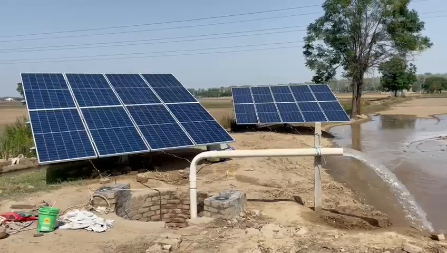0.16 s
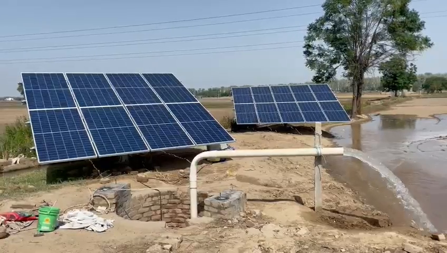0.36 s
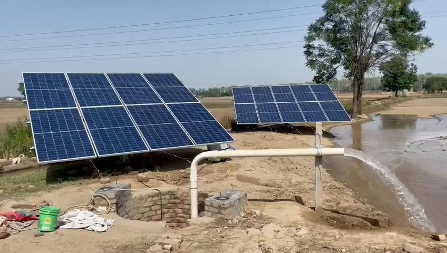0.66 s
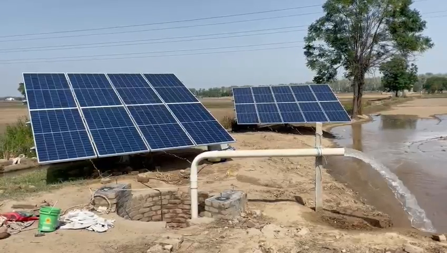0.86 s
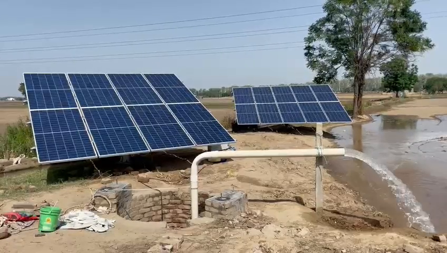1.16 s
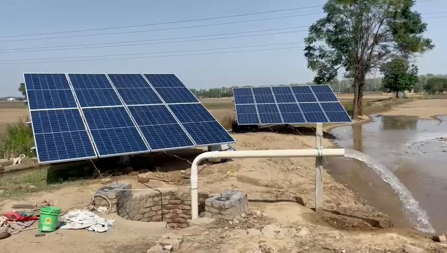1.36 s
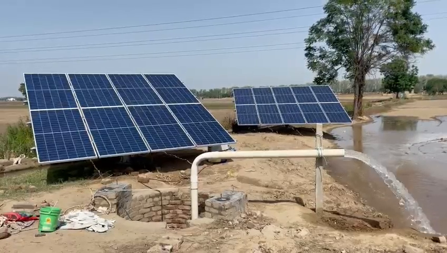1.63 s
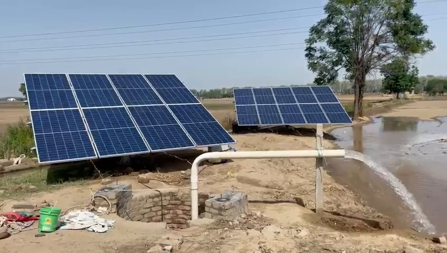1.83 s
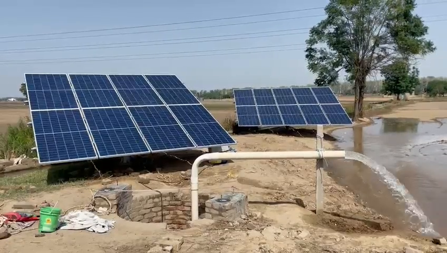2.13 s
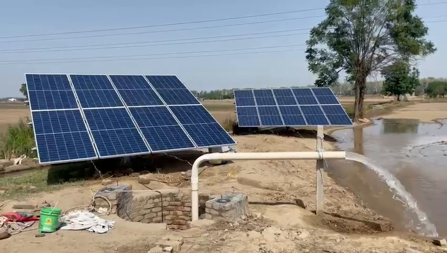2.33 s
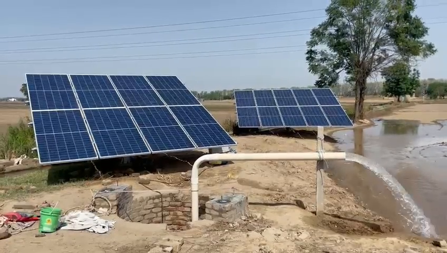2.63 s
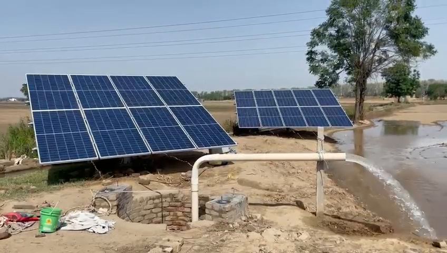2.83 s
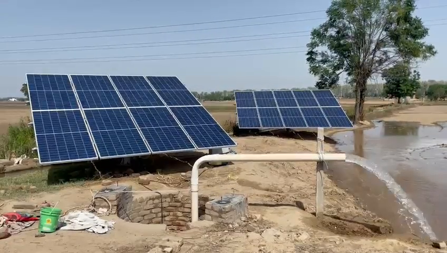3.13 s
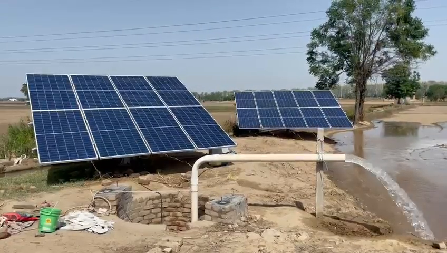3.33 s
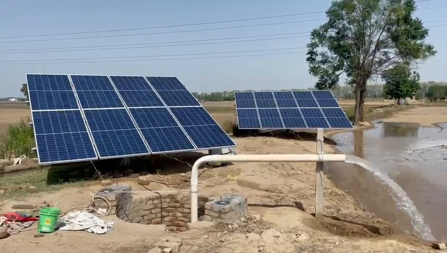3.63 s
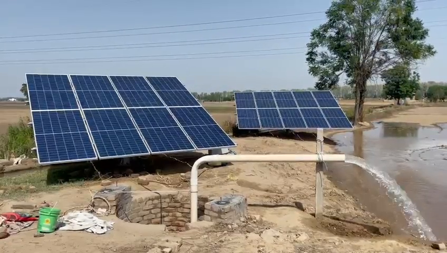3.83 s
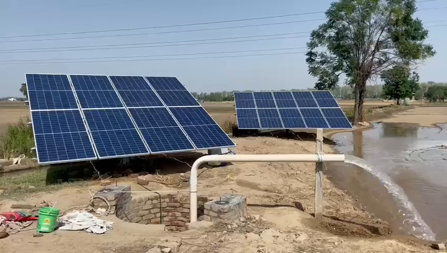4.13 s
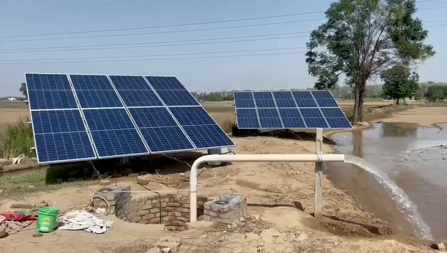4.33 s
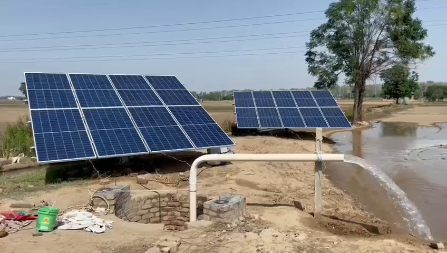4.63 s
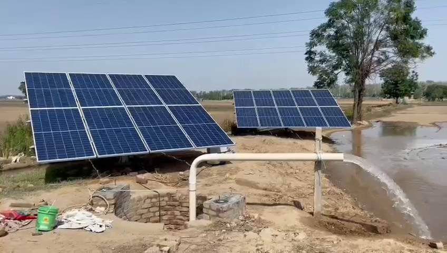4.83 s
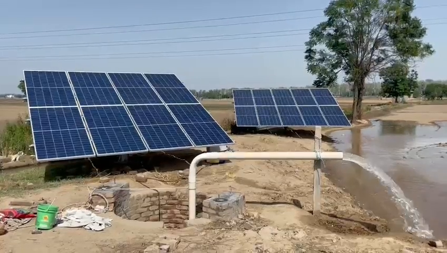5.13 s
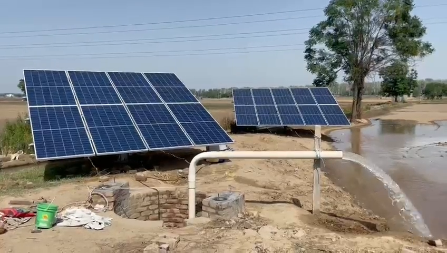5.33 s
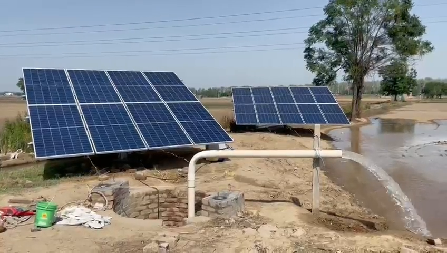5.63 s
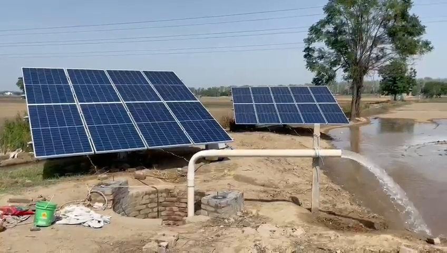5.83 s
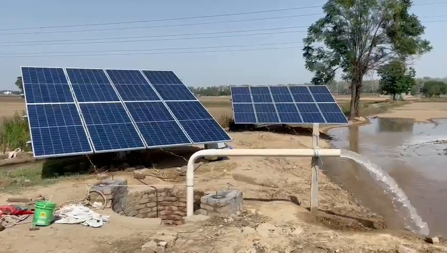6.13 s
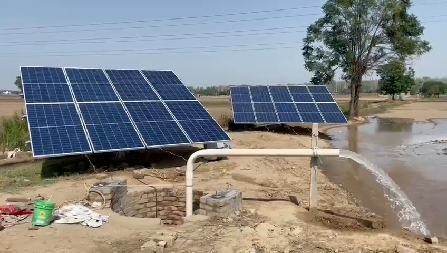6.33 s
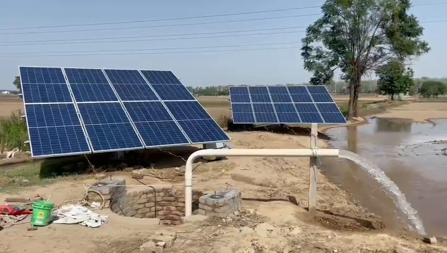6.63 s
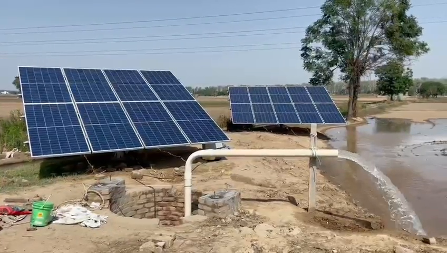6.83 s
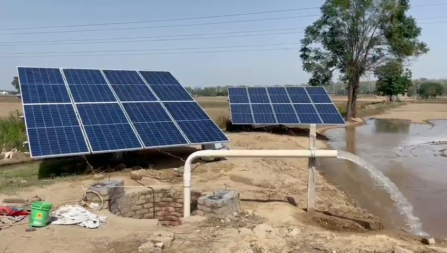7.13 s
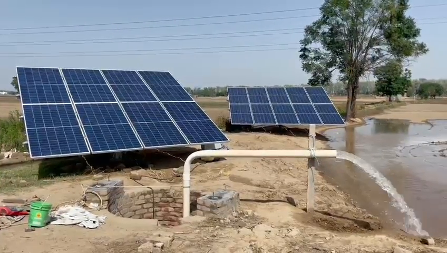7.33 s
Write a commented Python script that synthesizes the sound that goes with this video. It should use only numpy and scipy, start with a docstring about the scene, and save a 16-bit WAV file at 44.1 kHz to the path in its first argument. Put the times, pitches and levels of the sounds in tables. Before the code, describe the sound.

Outdoors a few metres from a pipe, a thick stream of water rushes without pause into a flooded field, gurgling low, churning in the middle and hissing with spray. Occasional bubbles plop and water lumps slap. Irregular wind buffets the unprotected stereo microphone in deep, short falling thumps, most crowded from about five to six seconds. A thin pump inverter whine stays faint underneath.

```python
"""Flooded field, a few metres from a pipe through which a solar pump throws a thick jet of water.
The jet is summed from ringing bubbles, drop ticks and foam noise in three bands; single bubbles
plop out of it and lumps of water slap down as short noise bursts.
The pump's inverter whines thinly in wavering sines and narrow noise.
Wind buffets the two ports of the microphone: filtered random kicks plus single falling thumps."""
import sys
import numpy as np
from scipy import signal
from scipy.fft import rfft, irfft
from scipy.io import wavfile

SR = 44100
rng = np.random.default_rng(int(sys.argv[2]) if len(sys.argv) > 2 else 0)


def wav_out(sig):
    """Save sig, one row per channel (or a flat mono array), as 16-bit PCM at SR to the path in sys.argv[1]."""
    wavfile.write(sys.argv[1], SR, np.round(np.clip(np.atleast_2d(sig).T, -1, 1) * 32767).astype(np.int16))


N = 329427
TIME, HZ = np.arange(N) / SR, np.fft.rfftfreq(N, 1 / SR)

# All levels in the time and event tables are before the trims in the functions; spectra are relative.

# wind strength: (time [s], level [dB])
WIND_LEVEL = [(0, -47.5), (0.4, -56.5), (.62, -44.5), (.68, -48), (0.73, -59), (.79, -47), (.88, -50),
              (1.15, -45), (1.3, -37.5), (1.37, -46), (1.46, -38), (1.59, -40), (1.9, -46), (2.15, -44),
              (2.4, -44), (2.44, -46), (2.52, -55), (2.68, -43), (2.85, -49.5), (3.15, -41), (3.45, -44),
              (3.58, -47), (3.72, -42.5), (3.98, -51), (4.15, -45), (4.47, -38.5), (4.68, -41.5),
              (4.77, -39.5), (4.86, -46), (4.95, -37), (5.22, -36.5), (5.4, -37), (5.85, -41), (6.1, -41),
              (6.33, -46), (6.63, -48), (6.85, -41), (7.15, -38), (7.27, -57), (7.36, -32), (7.47, -39)]
# wind rumble spectrum: (frequency [Hz], density [dB per Hz])
RUMBLE_SPECTRUM = [(15, -40), (28, -22), (42, -13.5), (60, -0.5), (100, -8.5), (200, -10.5), (255, -12),
                   (340, -35.5), (600, -22), (1500, -79), (4000, -103)]
# single strong eddies, wide ones sharper: (time [s], peak [dB], centre [Hz], width [octaves])
EDDIES = [(.034, -26, 123, 0.97), (.11, -25.5, 332, 0.6), (0.179, -29, 68, .6), (0.269, -34, 258, .7),
          (.614, -45, 200, .7), (1.435, -23.5, 201, 0.42), (1.487, -21, 105.5, 0.97), (1.564, -25, 252, .5),
          (1.674, -33, 90, 0.72), (1.744, -25, 109, .8), (1.763, -25.5, 247, 0.15),
          (1.778, -25.5, 89, 0.87), (1.795, -27.5, 120, 0.95), (1.958, -23.5, 282, 0.78),
          (2.024, -32, 127, 0.63), (2.119, -26, 70, 0.92), (2.182, -25, 110, .65),
          (2.389, -27.5, 282, 0.31), (3.257, -30, 226, 0.86), (3.408, -26.5, 105, 0.76),
          (3.667, -27, 137, 0.51), (3.821, -26, 99, 0.83), (4.071, -28, 123, 0.97), (4.308, -26, 252, 0.63),
          (4.454, -29.5, 188, 1), (4.741, -31, 191, 0.8), (4.801, -29, 170, 0.79), (4.936, -19, 127, 1),
          (4.962, -25, 65, 0.37), (4.99, -32, 76, 0.64), (5.012, -24, 64, 0.39), (5.036, -28, 234, 0.21),
          (5.093, -23, 105, 0.53), (5.14, -28, 134, .95), (5.172, -29, 142, .4), (5.329, -23.5, 65, 0.98),
          (5.349, -23, 119.5, 0.93), (5.39, -21, 136, 0.76), (5.42, -26, 76.5, 0.96),
          (5.445, -23, 108, 0.47), (5.514, -28.5, 160, 0.19), (5.533, -26, 65, 0.57),
          (5.602, -27, 66, 0.53), (5.699, -26, 65, .45), (5.74, -24.5, 103, 0.86), (5.764, -26.5, 74, 0.61),
          (5.813, -27, 89, 0.55), (5.875, -27, 170, .8), (5.93, -25, 143, 0.72), (5.951, -26.5, 170, 0.42),
          (6.169, -24, 225, 0.44), (6.247, -26, 290, 0.35), (6.551, -30.5, 132, 0.74),
          (6.676, -29, 88.5, 0.88), (6.808, -16.5, 184, 0.41), (6.825, -21.5, 104, 0.96),
          (6.896, -27, 166, 0.67), (6.982, -25.5, 141, 0.84), (7.048, -41, 99, 0.84),
          (7.17, -27.5, 107, 0.36), (7.342, -28, 121, 0.58), (7.395, -24, 80.5, 0.42),
          (7.466, -24, 306, 0.33)]
# inverter switching tone and sidebands: (frequency [Hz], level [dB rms], right/left factor [-])
INVERTER_TONES = [(4040, -73, -.2), (4118, -70.5, -.2), (7389, -73.5, -.1), (7922, -70, -1),
                  (8000, -59.5, -.97), (8234, -77, -1), (8533, -76, -.9)]
# splashing spectrum at the left port: (frequency [Hz], density [dB per Hz])
WATER_SPECTRUM = [(100, -6.5), (280, 0), (440, 1), (510, -4), (570, -11), (650, -8.5), (980, -10.5),
                  (1100, -11), (1520, -12.5), (1680, -14), (1790, -18), (1950, -12.5), (2130, -11),
                  (3050, -16), (3900, -18), (5300, -22.5), (6400, -21.5), (7600, -29), (8400, -55),
                  (9100, -27.5), (10250, -28), (11400, -27.5)]
# right port relative to left: (frequency [Hz], gain [dB])
RIGHT_GAIN = [(450, -.8), (600, -.8), (780, 5.5), (1080, -.6), (1970, .1), (2210, -13), (2430, -3.2),
              (2730, -12), (2900, -7.8), (3120, -13), (3400, -8.1), (3900, -6.4), (4400, -2.8), (5400, 0)]
# likeness of the ports: (frequency [Hz], likeness [0-1])
PORT_LIKENESS = [(450, .76), (950, .82), (1100, .98), (1300, .75), (2000, .87), (2200, .45), (2400, .77),
                 (4000, .35), (4400, .76), (5600, .98), (6700, .98), (7300, .6), (7650, 1), (9100, .99),
                 (9750, .6), (10400, 1)]
# lead of the left port: (frequency [Hz], phase [rad])
LEFT_LEAD = [(300, -.05), (650, -.9), (1100, .04), (1750, -1.2), (2100, .1), (2280, -3), (2600, -1),
             (2850, 1.4), (3600, 6.8), (4400, 12.7), (6950, 12.4), (7600, 9.45), (9400, 9.35),
             (10100, 2 * np.pi)]
# large bubbles plopping out of the rush: (time of peak [s], peak [dB], pitch [Hz], cycles to peak [-])
PLOP_EVENTS = [(.338, -25.5, 437, .5), (.802, -31, 466, 2.7), (1.067, -35, 1020, 2.5),
               (1.832, -32.5, 840, 2), (2.631, -37, 830, 1.8), (2.825, -30, 423, 1.2),
               (3.716, -31, 1630, 3.5), (4.487, -30, 378, 0.92), (6.726, -30.5, 367, 2.2),
               (6.893, -27, 430, 1.53), (7.44, -25.5, 2030, 3.8)]
# lumps of water slapping down: (time [s], level [dB], centre [Hz], width [octaves], decay [s])
SLAP_EVENTS = [(.383, -39.5, 1420, .3, .016), (.524, -42, 3400, .5, 0.0054), (.543, -40, 2700, 0.6, 0.011),
               (.562, -40.5, 2100, .4, .005), (.782, -36.5, 2900, 0.46, .008),
               (.793, -40, 2100, 0.47, 0.0098), (1.787, -36, 1000, 0.37, 0.0084),
               (1.998, -35.5, 3060, .37, .005), (2.132, -35, 1650, .55, 0.0087),
               (2.336, -44.5, 4480, .47, .029), (2.615, -40, 4800, .5, 0.0065),
               (2.666, -41, 3800, 0.72, .008), (3.038, -40, 1600, 0.39, 0.016),
               (3.148, -38.5, 1200, .8, 0.0067), (3.6, -44, 4500, 0.84, 0.021),
               (3.662, -42, 850, 0.5, .025), (3.853, -35.5, 1690, 0.45, 0.0096),
               (4.222, -37, 1600, 0.54, .007), (4.529, -42.5, 4360, 0.44, 0.012),
               (4.718, -44, 1040, .6, 0.032), (4.757, -40.5, 3000, 0.91, 0.006),
               (4.964, -44, 4200, 0.49, 0.0053), (5.815, -44.5, 4500, .59, .011),
               (5.986, -36, 2700, 0.49, 0.0088), (6.552, -37, 2100, .4, 0.0083),
               (6.872, -44, 920, .35, 0.012), (6.962, -44, 950, .35, 0.016), (6.977, -49, 5200, 0.5, .006),
               (7.436, -36, 2500, 0.66, 0.016)]
# low gurgling in the pool: (time [s], level [dB])
GURGLE_LEVEL = [(0, -42), (0.1, -45.5), (0.5, -45), (.6, -48), (.69, -50), (0.71, -57), (.75, -48),
                (0.785, -45.5), (1.0, -44), (1.16, -50.5), (1.3, -45.5), (1.6, -46.5), (1.85, -48.5),
                (2.23, -47), (2.39, -48.5), (2.425, -64), (2.48, -62), (2.52, -43.5), (2.68, -50.5),
                (2.75, -44), (3.4, -45), (3.55, -46.5), (3.8, -45), (3.9, -46), (4.1, -45.5), (4.57, -46.5),
                (4.64, -49), (4.69, -51), (4.74, -45), (4.86, -49.5), (4.97, -45.5), (5.58, -46),
                (5.64, -59), (5.69, -49), (6.0, -47), (6.5, -48.5), (6.68, -46), (6.88, -40.5), (6.95, -57),
                (7.02, -46), (7.28, -51.5), (7.47, -43)]
# gulps, the jet dragging a large air pocket under: (time [s], level [dB])
GULP_EVENTS = [(1.77, -35), (1.96, -39), (4.22, -43), (4.31, -40), (4.45, -36), (5.68, -33.5), (6.15, -37),
               (6.54, -35), (7.0, -36.5), (7.37, -37)]
# churning where the jet lands, between gurgle and spray: (time [s], level [dB])
CHURN_LEVEL = [(0.0, -48), (0.16, -44), (.4, -45.5), (1.02, -44.5), (1.08, -45), (1.14, -46.5),
               (1.25, -44.5), (1.65, -45), (1.98, -44), (2.04, -49.5), (2.11, -46), (2.32, -43),
               (2.44, -44.5), (2.65, -45), (2.95, -45.5), (3.15, -44.5), (3.58, -46), (3.7, -42.5),
               (3.88, -46.5), (4.45, -44), (4.65, -44.5), (4.75, -41.5), (4.83, -49.5), (4.96, -43),
               (5.08, -48), (5.3, -45), (5.8, -45), (6.15, -45), (6.25, -46), (6.6, -45), (6.8, -46),
               (6.86, -45.5), (7.03, -44.5), (7.1, -46), (7.2, -45.5), (7.47, -45.5)]
# spray thrown up by the jet: (time [s], level [dB])
SPRAY_LEVEL = [(0, -54), (.14, -49), (.22, -52), (0.4, -50), (0.55, -49), (.86, -49.5), (.94, -48),
               (1.15, -50), (1.7, -50), (2.3, -49), (2.43, -49.5), (2.65, -47.5), (2.83, -46.5),
               (2.92, -51.5), (3.0, -48), (3.62, -47.5), (4.2, -48), (4.48, -51), (4.58, -49), (4.65, -51),
               (4.75, -47), (4.86, -50), (4.97, -48), (5.5, -50.5), (5.8, -48.5), (5.88, -49), (5.96, -47),
               (6.3, -49), (6.57, -48), (6.76, -50), (7.02, -46.5), (7.16, -50), (7.47, -46.5)]

WAKE_FOLLOW_DB_PER_DB, WAKE_REF_DB = 0.92, -18  # wake level against eddy peak
WAKE_LAG_S = 0.0092  # wake trails its eddy
APART_HZ = 135  # above this the ports feel different eddies
PLOP_RISE_PER_S = 2.9  # pitch climb per second, as a share of the starting pitch
EDGE_HZ = 11800


def amp(db):
    """Decibels to gain."""
    return 10 ** (np.asarray(db) / 20)


def unit(x):
    """Scales to rms 1."""
    return x / np.sqrt(np.mean(x ** 2) + 1e-20)


def along_hz(points):
    """Reads a table on a logarithmic frequency axis."""
    hz, value = np.transpose(points)
    return np.interp(np.log(HZ + 1), np.log(hz + 1), value)


def along_time(points):
    """Reads a time curve at each sample."""
    s, value = np.transpose(points)
    return np.interp(TIME, s, value)


def drift(rate_hz):
    """Random piecewise-linear curve of rms 1 that changes at up to about this rate."""
    knots = rng.standard_normal(8192)
    return unit(np.interp(TIME * 2 * rate_hz + rng.random(), np.arange(len(knots)), knots))


def hump(hz, centre_hz, octaves):
    """Bell-shaped band on the octave scale."""
    return np.exp(-.5 * (np.log2((hz + 1) / centre_hz) / octaves) ** 2)


def above(x, hz):
    """The part of a sound above this frequency."""
    return irfft(rfft(x) / (1 + (hz / (HZ + 1)) ** 6), N)


def add(mix, s, sound):
    """Mixes a sound in from time s on, cropped to the scene."""
    start = round(s * SR)
    sound = sound[..., max(-start, 0):]
    part = mix[..., max(start, 0):][..., :sound.shape[-1]]
    part += sound[..., :part.shape[-1]]


def kicks(per_s, spread_db):
    """Random train of pushes of either sign, most of them small."""
    sizes = amp(spread_db * np.minimum(rng.exponential(1, N), 4)) * rng.choice([-1, 1], N)
    return unit(sizes * (rng.random(N) < per_s / SR))


def swells(times_s, levels_db, width_s):
    """Joint level curve of brief bell-shaped swells, summed in power."""
    power = np.zeros(N)
    t = np.arange(-SR // 4, SR // 4) / SR
    for s, db in zip(times_s, levels_db):
        add(power, s + t[0], amp(db) ** 2 * np.exp(-(t / width_s) ** 2))
    return np.sqrt(power)


def ports(near, scattered):
    """Spectra of direct and scattered sound, as the left and right ports hear them."""
    same = np.clip(along_hz(PORT_LIKENESS), 0, 1)
    blend = same * near + np.sqrt(1 - same ** 2) * scattered
    right = blend * amp(along_hz(RIGHT_GAIN)) * np.exp(-1j * along_hz(LEFT_LEAD))
    return irfft(np.array([near, right]), N)


def bass_lag_s(hz, turns=1.677):
    """The microphone passes low notes late, so each push of air falls in pitch."""
    return turns / np.sqrt(hz ** 2 + 45 ** 2)


def lagged(hz):
    """Phase turn of the bass lag: the delay summed over frequency."""
    return np.exp(-2j * np.pi * np.cumsum(bass_lag_s(hz)) * hz[1])


def stirred(band_hz, octaves, width_s):
    """Turbulence level around the strong eddies: each stirs the band near its own size."""
    s, db, centre_hz, _ = np.transpose(EDDIES)
    wake_db = WAKE_REF_DB + WAKE_FOLLOW_DB_PER_DB * (db - WAKE_REF_DB)
    nearness_db = 20 * np.log10(hump(centre_hz, band_hz, octaves) + 1e-6)
    return swells(s + WAKE_LAG_S, wake_db + nearness_db, width_s)


def wind(deep_db=0.0, flutter_db=4.0, flutter_follow=0.47, lumpy_db=2.5,
         deep_wake_db=-14, flutter_wake_db=-12, split_hz=100, smooth_db=-4):
    """Separate eddies: large ones shared by the ports, small ones differing and growing less in a gust."""
    gust_db = along_time(WIND_LEVEL)
    lumps_db = lumpy_db * drift(rate_hz=12)
    deep_wake = amp(deep_wake_db) * stirred(band_hz=78, octaves=1.3, width_s=0.066)
    deep = np.hypot(amp(gust_db + deep_db + lumps_db), deep_wake)
    soft_gust_db = gust_db.mean() + flutter_follow * (gust_db - gust_db.mean())
    flutter_wake = amp(flutter_wake_db) * stirred(band_hz=235, octaves=0.18, width_s=0.015)
    flutter = np.hypot(amp(soft_gust_db + flutter_db + lumps_db), flutter_wake)

    eddies = np.array([kicks(per_s=130, spread_db=1.2) for _ in range(2)])
    air = eddies + amp(smooth_db) * rng.standard_normal((2, N))
    shared, apart = rfft(air) * amp(along_hz(RUMBLE_SPECTRUM)) * lagged(HZ)
    apart = .85 * apart * HZ / np.hypot(HZ, APART_HZ)
    rumble = unit(irfft(np.array([shared + apart, shared - apart]), N))
    small = above(rumble, split_hz)
    return (rumble - small) * deep + small * flutter


def buffets(level_db=-1):
    """Each strong eddy is one push of air that comes out as a short falling thump, alike at both ports."""
    out, size = np.zeros((2, N)), 8192
    hz = np.fft.rfftfreq(size, 1 / SR)
    for s, db, centre_hz, octaves in EDDIES:
        spectrum = hump(hz, centre_hz, octaves) / np.sqrt(hz + 1) * lagged(hz)
        thump = np.fft.fftshift(irfft(spectrum))
        start_s = s - size / 2 / SR - bass_lag_s(centre_hz)
        add(out, start_s, amp(db + level_db) * thump / abs(thump).max())
    return out


def inverter(waver_db=0.5, waver_turns=0.025, fizz_db=-66):
    """Switching tones wavering a little in the moving air, in a fizz of countless weak sidebands."""
    fizz = irfft(rfft(rng.standard_normal(N)) * hump(HZ, 8000, .04), N)
    out = amp(fizz_db) * unit(fizz) * np.array([[1], [-1]])  # opposite at the ports
    for hz, db, right in INVERTER_TONES:
        turns = hz * TIME + waver_turns * drift(rate_hz=6.4)
        tone = np.sin(2 * np.pi * turns) * amp(waver_db * drift(rate_hz=11.0))
        out += amp(db) * unit(tone) * np.array([[1], [right]])
    return out


def plops(level_db=-1):
    """A large bubble swells into a short note that climbs a little as it nears the surface."""
    out, t = np.zeros(N), np.arange(4096) / SR
    for s, db, hz, cycles in PLOP_EVENTS:
        swell_s = cycles / hz
        turns = hz * (t + PLOP_RISE_PER_S * t ** 2 / 2) + rng.random()
        shape = t / swell_s * np.exp(1 - t / swell_s)
        add(out, s - swell_s, amp(db + level_db) * shape * np.sin(2 * np.pi * turns))
    direct = rfft(out)
    return ports(direct, 1j * direct)


def slaps(rise_s=0.00037, level_db=1, skirt_db=-12, skirt_octaves=2.4):
    """A lump of water bursts into a short dense splash, with a skirt of droplets of all sizes."""
    out, t = np.zeros((2, N)), np.arange(4096) / SR  # rows: direct, scattered
    hz = np.fft.rfftfreq(len(t), 1 / SR)
    for s, db, centre_hz, octaves, decay_s in SLAP_EVENTS:
        skirt = amp(skirt_db) * octaves * hump(hz, centre_hz, skirt_octaves)
        colour = hump(hz, centre_hz, octaves) + skirt
        burst = unit(irfft(rfft(rng.standard_normal((2, len(t)))) * colour))
        shape = (1 - np.exp(-t / rise_s)) * np.exp(-t / decay_s)
        add(out, s, amp(db + level_db) * burst * shape / shape.max())
    return ports(*rfft(out))


def bubbles(per_s, cycles, rise, spread_db, count):
    """Bubbles ring briefly and rise in pitch, small ones commoner; per_s is one size's rate at 1 kHz."""
    out = np.zeros(N)
    for hz in np.geomspace(280, 9000, count):
        life = cycles * rng.uniform(.6, 1.4)  # decay, in cycles
        age = np.arange(int(4 * life * SR / hz)) * hz / SR / life  # in decay times
        ring = np.exp(-age) * np.sin(2 * np.pi * life * (age + rise * age ** 2 / 2))
        number = int(per_s * hz / 1000 * N / SR)
        when, chance, side = rng.random((3000, 3))[:number].T
        sizes = amp(spread_db * np.minimum(-np.log(chance), 4)) * np.sign(side - .5)
        places = (when * N).astype(int)[:, None] + np.arange(len(ring))
        rings = np.outer(sizes, ring)
        out += np.sqrt(hz) * np.bincount(places.ravel(), rings.ravel(), N)[:N]
    return unit(out)


def splashing(bubble_db=0, drop_db=-1.5, foam_db=-6):
    """Ringing bubbles, sharp ticks of drops and the smooth hiss of foam together."""
    ringing = bubbles(per_s=13, cycles=11.1, rise=0.034, spread_db=0.84, count=120)
    ticking = kicks(per_s=6000, spread_db=4.5)
    foam = rng.standard_normal(N)
    return unit(amp(bubble_db) * ringing + amp(drop_db) * ticking + amp(foam_db) * foam)


def jet(gurgle_db=4.0, gulp_db=-1.0, gulp_s=0.023, churn_db=6.0, churn_follow=0.38, spray_db=9.5,
        gulp_hz=560, spray_hz=2400, slosh_db=-0.3, glug_db=-0.13, burst_db=0.94, surge_db=0.74):
    """The jet lands unevenly: gurgles and gulps below, churns in the middle, throws bursts of spray on top."""
    gurgle, churn, spray = along_time(GURGLE_LEVEL), along_time(CHURN_LEVEL), along_time(SPRAY_LEVEL)
    colour = unit(amp(along_hz(WATER_SPECTRUM)))
    water = ports(rfft(splashing()) * colour, rfft(splashing()) * colour)
    upper, top = above(water, gulp_hz), above(water, spray_hz)

    gulps = amp(gulp_db) * swells(*np.transpose(GULP_EVENTS), gulp_s)
    gurgle_gain = np.hypot(amp(gurgle + gurgle_db + slosh_db * drift(rate_hz=20)), gulps)
    follow_db = churn_follow * (spray - spray.mean())  # churn partly follows the spray
    churn_gain = amp(churn + churn_db + follow_db + glug_db * drift(rate_hz=36))
    spray_gain = amp(spray + spray_db + burst_db * drift(rate_hz=45))
    bands = (water - upper) * gurgle_gain + (upper - top) * churn_gain + top * spray_gain
    return bands * amp(surge_db * drift(rate_hz=24))


def scene():
    """Wind on the microphone, pump and water in the open field."""
    return wind() + buffets() + inverter() + plops() + slaps() + jet()


def record(dry):
    """Band limit: a linear-phase low-pass at EDGE_HZ."""
    low_pass = signal.firwin(511, EDGE_HZ, window=("kaiser", 9), fs=SR)
    return signal.oaconvolve(dry, low_pass[None], "same")


dry = scene()
out = record(dry)
wav_out(out)
```